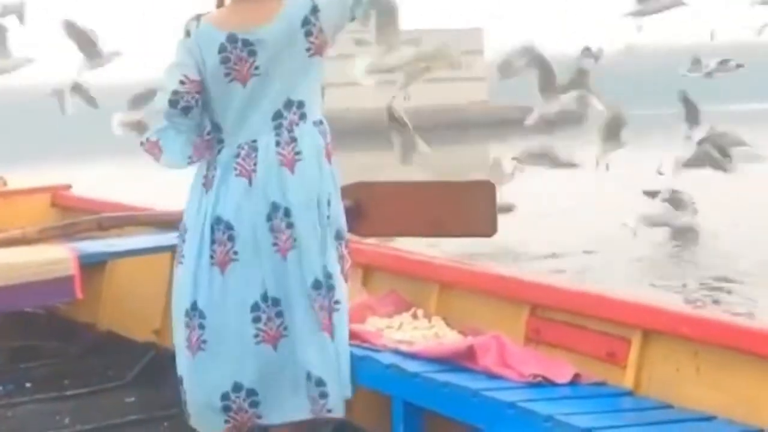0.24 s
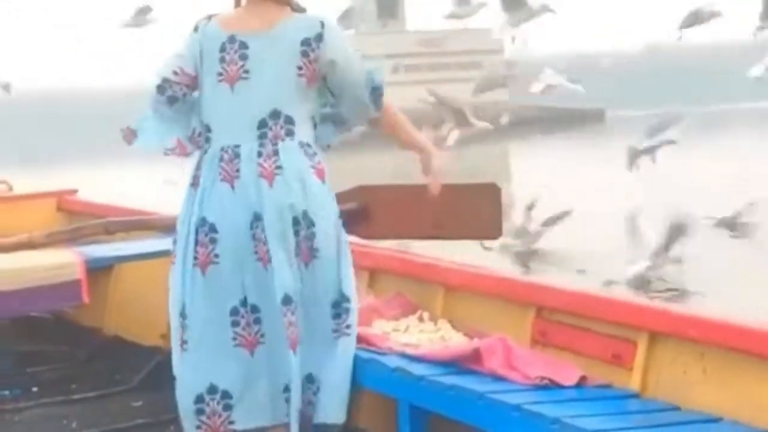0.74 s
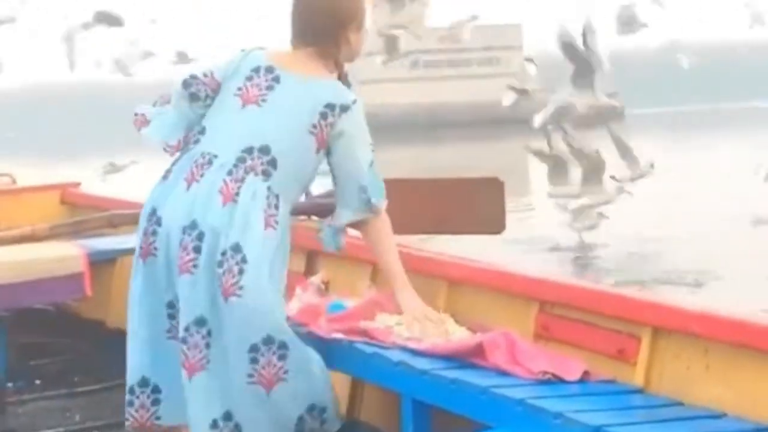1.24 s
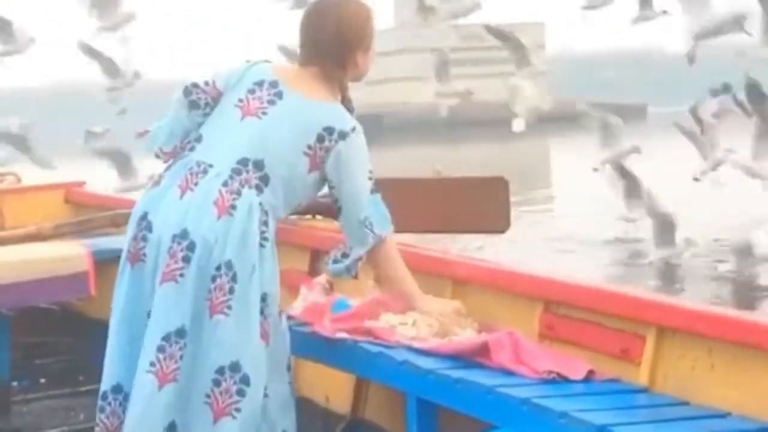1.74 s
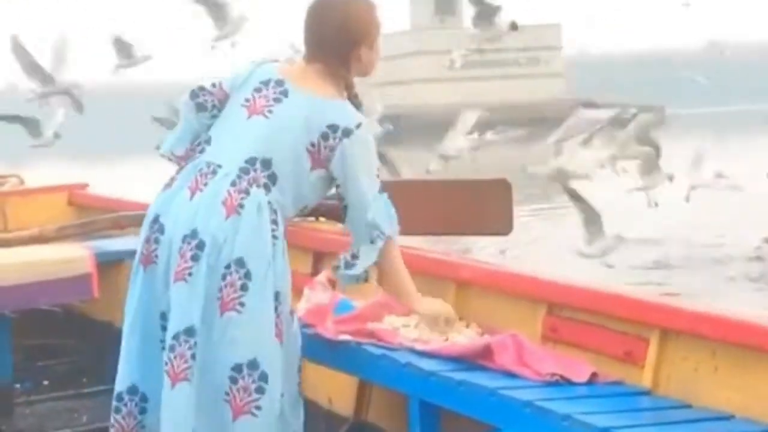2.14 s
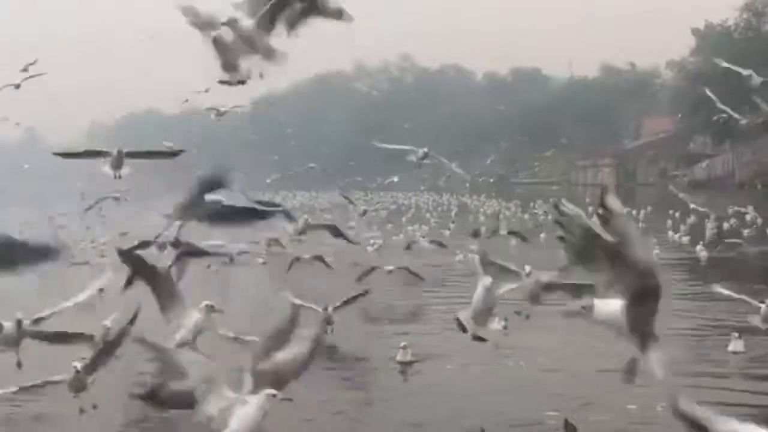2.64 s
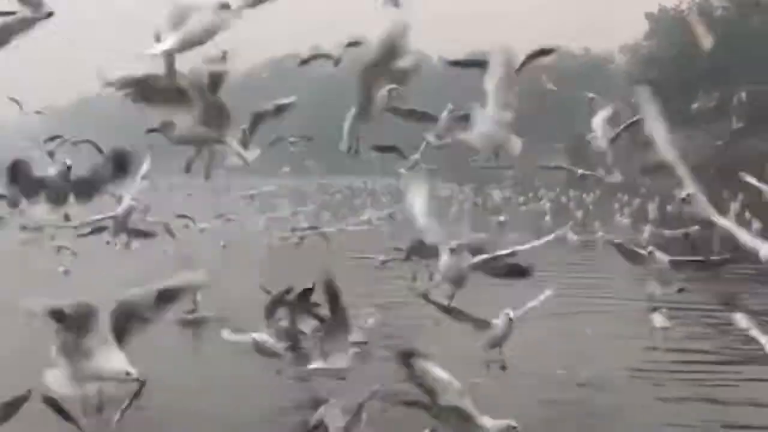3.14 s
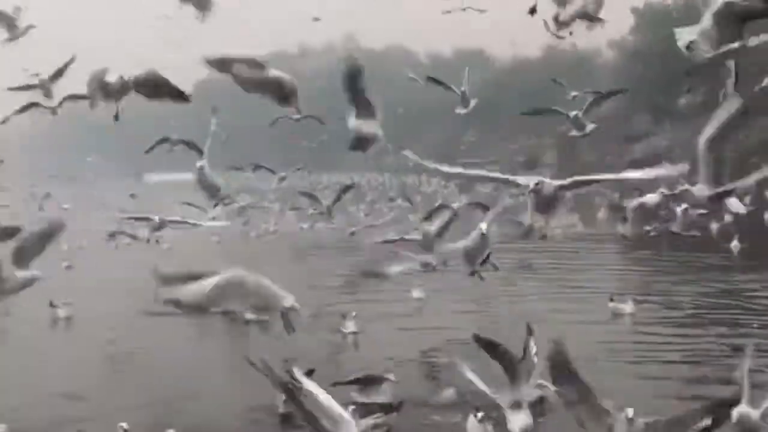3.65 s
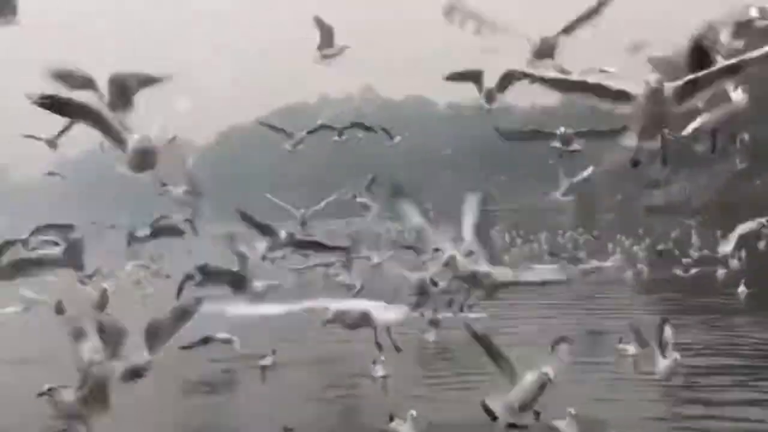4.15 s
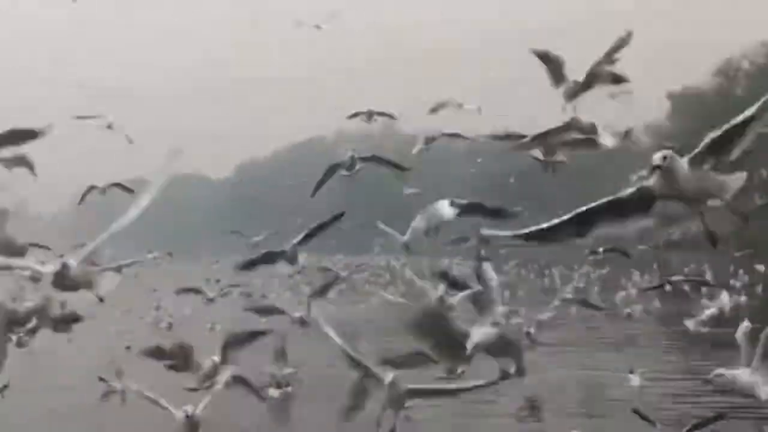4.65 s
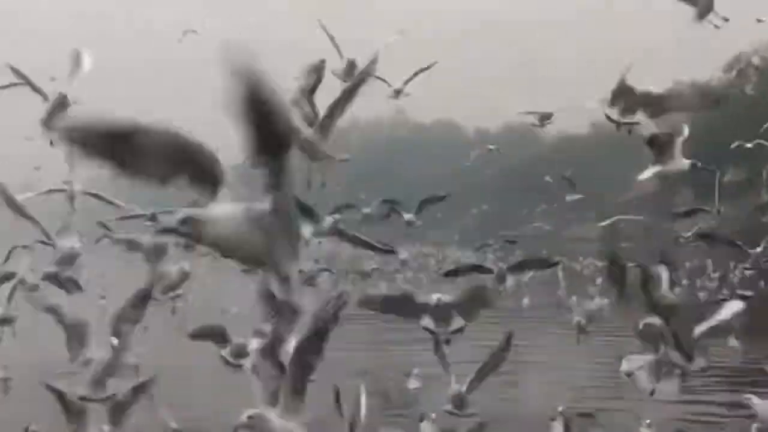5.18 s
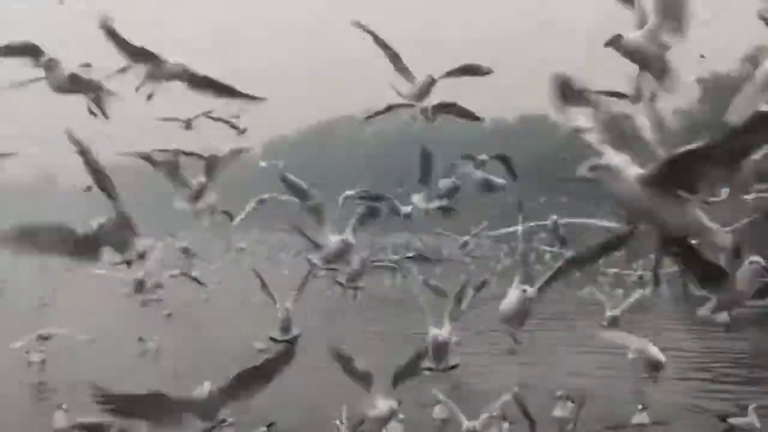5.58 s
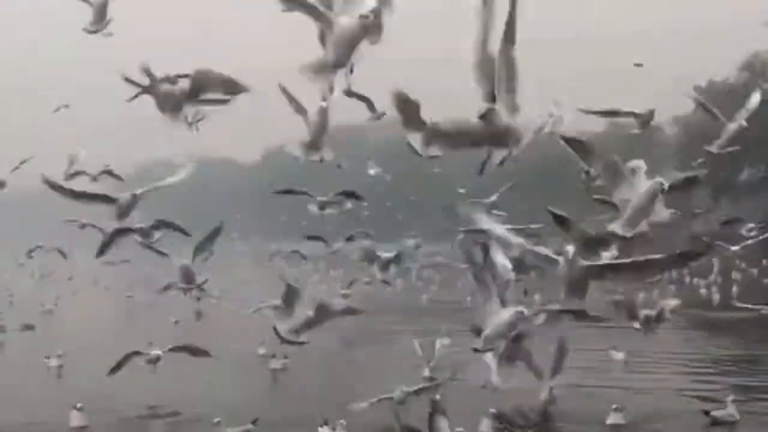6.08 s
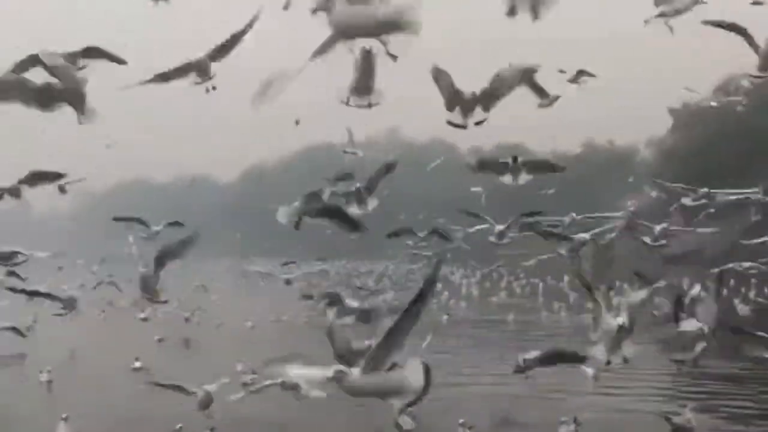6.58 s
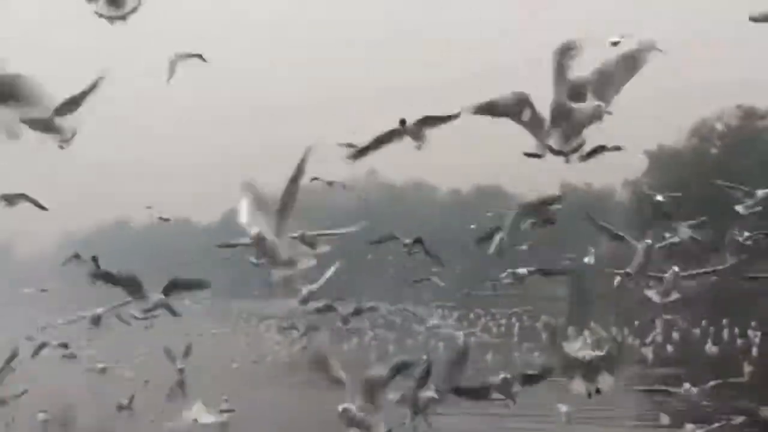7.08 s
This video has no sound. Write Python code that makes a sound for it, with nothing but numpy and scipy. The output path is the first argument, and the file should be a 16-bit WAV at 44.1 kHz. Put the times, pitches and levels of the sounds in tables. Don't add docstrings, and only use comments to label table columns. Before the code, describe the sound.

Overlapping rattling gull cries with low wind thumps beside a boat, cutting abruptly to louder, piercing squeals above a steady low rumble.

```python
import sys
import numpy as np
from scipy import signal
from scipy.io import wavfile
from scipy.ndimage import uniform_filter1d

SR = 44100
rng = np.random.default_rng(int(sys.argv[2]) if len(sys.argv) > 2 else 0)


def invert_db(x):
    u = np.asarray(x, float) / 20
    return 10 ** u


def persist_wave(psi):
    counts = np.round(np.clip(psi, -1, 1) * 32767).astype(np.int16)
    wavfile.write(sys.argv[1], SR, np.atleast_2d(counts).T)


N = 322812
T = np.arange(N) / SR
COARSE_T = T[::64]
CUT_S = 2.563

# frequency in Hz, level in dB per Hz.
FLOCK_BESIDE = [(260, -17), (450, -29), (769, -15.5), (928, -11.5), (1220, -11.5), (1430, -9.5),
                (1580, -7.5), (2240, 3.5), (2750, -2), (4000, 2), (4830, -10), (5580, -9.5), (7900, -17.5),
                (12000, -8.5), (14300, -12.5)]
# frequency in Hz, level in dB per Hz.
FLOCK_OVERHEAD = [(260, 0), (450, -21.5), (1350, -16.5), (2240, -1), (2630, -2.5), (3220, 4.5),
                  (3780, -1.5), (4360, -1), (4970, -10), (5910, -9), (7670, -19), (9390, -22.5),
                  (10400, -22), (12900, -22), (14300, -20)]
# start in seconds, length in seconds, peak level in dB,
# shrillness as upper harmonics in dB relative to the peak.
WAVES_BESIDE = [(-0.164, 0.46, -38, -9.5), (0.087, 0.086, -49, -12), (0.22, 0.2, -40, -11),
                (0.391, 0.11, -43, -7), (0.426, 0.32, -44, -9.5), (0.633, 0.17, -38.5, -11.5),
                (0.773, 0.21, -42.5, -11), (0.948, 0.055, -42, -13), (0.998, 0.18, -40, -9.5),
                (1.103, 0.15, -39, -9), (1.208, 0.29, -39.5, -8.5), (1.373, 0.22, -37, -10),
                (1.534, 0.16, -41, -9), (1.625, 0.2, -39.5, -6.5), (1.763, 0.147, -38, -10.5),
                (1.879, 0.22, -37.5, -7.5), (1.992, 0.39, -38.5, -10), (2.222, 0.34, -40, -9.5),
                (2.479, 0.31, -37, -14.1)]
# start in seconds, length in seconds, peak level in dB,
# shrillness as upper harmonics in dB relative to the peak.
WAVES_OVERHEAD = [(2.423, 0.49, -29, -6.5), (2.756, 0.5, -27, -8), (2.768, 0.082, -29, -15),
                  (3.144, 0.19, -28, -9.5), (3.24, 0.49, -27.5, -6.5), (3.575, 0.22, -29, -7.5),
                  (3.724, 0.36, -30, -8), (3.932, 0.21, -25.5, -9.9), (4.084, 0.18, -27.5, -6.5),
                  (4.191, 0.51, -27.5, -7), (4.217, 0.27, -29.5, -4), (4.596, 0.22, -26.5, -4),
                  (4.66, 0.41, -28.5, -10), (4.763, 0.12, -27, -7.5), (4.895, 0.27, -34, -3),
                  (5.025, 0.22, -25, -8.5), (5.188, 0.32, -29, -7.5), (5.424, 0.24, -27.5, -8.5),
                  (5.527, 0.38, -28.5, -4.5), (5.767, 0.3, -28, -8.8), (5.888, 0.26, -28.5, -5),
                  (6.047, 0.2, -28, -6), (6.127, 0.38, -31, -11.1), (6.267, 0.26, -32.5, -3.9),
                  (6.429, 0.42, -29, -6.5), (6.759, 0.21, -30, -3.5), (6.922, 0.089, -32, -20),
                  (6.979, 0.23, -30.5, -8.1), (7.13, 0.25, -34, -1.1)]
# level of cries in dB, level of upper harmonics in dB.
LULL_DB = [
    (-64, -62.5),
    (-40, -45.5),
]
# frequency in Hz, level in dB per Hz.
OPEN_WIND = [(8.8, -37), (15, -17), (38, 14), (58, -1.5), (189, -14.5), (253, -21.5), (296, -20),
             (454, -29.5), (900, -33), (1170, -65), (1980, -120)]
# frequency in Hz, level in dB per Hz.
SHELTERED_RUMBLE = [(8.8, -66), (15, -36), (21, -60), (37, -1.5), (97, 0), (177, 0.5), (217, -1),
                    (494, -28.5), (900, -8.5), (1170, 7), (1980, -120)]
# start in seconds, length in seconds, thud level in dB,
# flutter in dB relative to the thud.
GUSTS = [(0.034, 0.19, -48, -7), (.168, .129, -37.5, -3.3), (.251, 0.091, -29.5, -17.6),
         (.355, 0.086, -38.5, 0), (.361, 0.16, -33, -20), (.491, 0.18, -30.7, -13.5),
         (.59, 0.12, -31.5, -4.5), (.67, 0.28, -32, -14.5), (.727, .096, -28.8, -30),
         (.775, 0.51, -38, -20), (1.109, 0.11, -35.5, -8), (1.213, .179, -36, -14), (1.26, .07, -33.5, -12),
         (1.357, 0.21, -37, -6.5), (1.457, 0.13, -24.2, -7.5), (1.564, .081, -32.5, -11),
         (1.65, .096, -41, -17), (1.7, 0.19, -33, -13.5), (1.735, 0.093, -30.5, -22), (1.85, .116, -43, -3),
         (1.93, .09, -27, -13), (1.94, 0.22, -25, -15), (2.103, .187, -37.5, -8.6),
         (2.21, 0.14, -27.5, -8.5), (2.323, .168, -26, -9), (2.48, 0.14, -33.5, -10)]
# start in seconds, length in seconds, thud level in dB,
# flutter in dB relative to the thud.
LURCHES = [
    (2.5, .2, -48, -2),
    (2.983, .2, -46, -6),
    (3.57, 0.27, -51, 2),
    (4.51, 0.16, -48, -2),
    (5.233, 0.21, -44.5, 4),
    (6.496, 0.13, -51, -28),
    (6.826, 0.24, -53.5, 9.5),
    (7.207, 0.43, -46, -8),
]
# thud level in dB, flutter level in dB, rush level in dB.
CALM_DB = [
    (-44.5, -63, -61),
    (-49, -54, -50),
]
# start in seconds, length in seconds,
# middle pitch in Hz, slide as a share of pitch, level in dB.
SQUEALS_BESIDE = [(.07, 0.077, 3800, -.04, -43), (0.532, 0.091, 4320, -.08, -45),
                  (0.544, 0.068, 2900, -.06, -47), (1.04, .08, 5700, -.02, -45),
                  (.192, 0.05, 2330, -.02, -39), (.218, 0.05, 3770, .09, -39),
                  (.299, 0.042, 5130, -.03, -41), (.397, .049, 2270, 0.12, -34),
                  (.406, 0.054, 3330, -0.053, -39), (.826, 0.066, 1445, -0.056, -44),
                  (1.15, 0.083, 4460, 0.0, -43), (1.647, 0.087, 3890, -.02, -35.5),
                  (1.662, 0.13, 2640, -0.043, -40), (1.977, 0.11, 4230, .02, -39),
                  (2.167, 0.073, 1907, -0.014, -35.5), (2.354, 0.056, 2360, -.1, -46)]
# start in seconds, length in seconds,
# middle pitch in Hz, slide as a share of pitch, level in dB.
SQUEALS_OVERHEAD = [(2.853, 0.078, 5270, -.02, -32), (3.146, .092, 5740, .02, -33),
                    (3.477, 0.084, 2470, -0.045, -26), (3.49, 0.036, 3690, 0.017, -23),
                    (3.611, 0.059, 3390, 0.029, -27), (3.637, .057, 4540, -.01, -31),
                    (3.989, 0.106, 2440, 0.01, -27), (4.28, 0.082, 2306, 0.0062, -25),
                    (4.36, .059, 5600, 0.0081, -30), (4.69, .06, 3450, 0.021, -29),
                    (4.638, 0.084, 2480, -0.018, -30), (5.07, 0.074, 3240, -.04, -30),
                    (5.112, 0.16, 2340, .03, -24.5), (5.294, 0.07, 2310, -0.029, -29),
                    (5.517, 0.093, 3000, -0.015, -45), (5.63, .11, 5880, -.02, -30),
                    (5.648, 0.12, 3500, 0.073, -30), (5.655, 0.065, 3270, 0.021, -33),
                    (5.946, 0.15, 2400, 0.088, -27), (6.373, 0.07, 5320, 0.012, -34),
                    (6.608, .074, 5470, .03, -33), (6.62, 0.061, 3270, -0.013, -28),
                    (6.841, .043, 5450, -0.043, -35), (6.85, 0.059, 3040, -0.025, -31)]
# start in seconds, peak level in dB.
POPS = [
    (0.382, -38),
    (0.615, -33),
    (1.48, -24.5),
    (1.532, -31),
    (1.957, -31),
    (1.986, -28.5),
    (2.044, -35),
    (2.258, -34),
    (2.376, -28.5),
    (2.399, -33),
]
# start in seconds, length in seconds, pitch in Hz, level in dB.
KNOCKS = [
    (3.6, 0.11, 109, -36),
    (5.27, 0.093, 116.8, -35.5),
    (6.877, 0.105, 101.7, -33.5),
]
# frequency in Hz, width in Hz, share of time empty.
STARVED_BANDS = [
    (4980, 220, 0.09),
    (7840, 210, 0.15),
    (10530, 650, 0.48),
    (13700, 560, 0.24),
]
# start in seconds, length in seconds, step in Hz.
EDGE_STEPS = [
    (.09, .07, 800),
    (.23, .04, 700),
    (.65, .13, -500),
    (.78, .22, 750),
    (1.21, .42, 250),
    (1.21, .18, 300),
    (1.45, .07, 550),
]


def evened(x):
    return x / np.sqrt(np.mean(abs(x) ** 2) + 1e-20)


def read(points, hz):
    f, value = np.transpose(points)
    return np.interp(np.log(hz + 1), np.log(f + 1), value)


def add(mix, s, sound):
    part = mix[round(s * SR):][:len(sound)]
    part += sound[:len(part)]


def smoothed(x, span):
    return uniform_filter1d(uniform_filter1d(x, span), span)


def wander(size, span):
    return evened(smoothed(rng.standard_normal(size), span))


def swells(rows, calm_db, lean, sharp):
    s, length, db, rel_db = np.transpose(rows)[:, :, None]
    progress = np.clip((COARSE_T - s) / length, 0, 1)
    shape = np.sin(np.pi * progress ** lean).clip(0) ** sharp
    levels = []
    for calm, peak_db in zip(calm_db, (db, db + rel_db)):
        power = invert_db(2 * calm) + (invert_db(2 * peak_db) * shape).sum(0)
        levels.append(10 * np.log10(power))
    return levels


def played(x, spectra, shots, edges_hz, size, span, steady):
    hz, _, z = signal.stft(x, SR, nperseg=size, noverlap=size * 3 // 4)
    z = z / np.sqrt(uniform_filter1d(np.mean(abs(z) ** 2, 1), size=3))[:, None]
    out = np.zeros(N)
    for shot, (spectrum, levels_db) in enumerate(zip(spectra, shots)):
        in_shot = (T >= CUT_S) == shot
        for lo, hi, level_db in zip(edges_hz, edges_hz[1:], levels_db):
            slopes = (1 + (lo / (hz + 1)) ** 12) * (1 + (hz / hi) ** 12)
            band = invert_db(read(spectrum, hz)) / np.sqrt(slopes)
            part = signal.istft(z * band[:, None], SR, nperseg=size, noverlap=size * 3 // 4)[1][:N]
            own_swell = smoothed(part ** 2, span) ** (steady[shot] / 2)
            out += evened(part / own_swell) * invert_db(np.interp(T, COARSE_T, level_db)) * in_shot
    return out


def cry(draw, pitch_hz=1110, spread=.13, arch=.07, jitter=.043, rattle=.85, breath=.3):
    long, high, rough, fast, distant, odd, _ = draw
    u = np.linspace(0, 1, int(SR * (.04 + .11 * long ** 2)))
    own_pitch = spread * (2 * high - 1) * (1 + 1.2 * odd ** 4)
    hz = pitch_hz * (1 + own_pitch - arch * (2 * u - .9) ** 2)
    unsteady = 1 + jitter * (0.444 + rough) * wander(len(u), span=40)
    turn = 2 * np.pi * np.cumsum(hz * unsteady) / SR
    pulses = 1 / (1.49 - 1.4 * np.cos(turn))
    pulses = evened(np.gradient(np.gradient(pulses)))
    rattle_hz = (70 + 200 * fast) * (1 + 0.21 * wander(len(u), span=300))
    rattle_turn = 2 * np.pi * np.cumsum(rattle_hz) / SR
    voice = pulses + breath * rng.standard_normal(len(u))
    voice = voice * (1 + rattle * rough * np.cos(rattle_turn))
    return invert_db(-9 * distant) * voice * np.sin(np.pi * u ** .6) ** .7


def calling(shot):
    wash_db, wash_follow = (-50, -38.5)[shot], (0.25, 0.068)[shot]
    hiss_db, hiss_follow = (-57, -44)[shot], (0.4, 0.44)[shot]
    waves = (WAVES_BESIDE, WAVES_OVERHEAD)[shot]
    cries_db, shrill_db = swells(waves, LULL_DB[shot], lean=0.78, sharp=1.97)
    wash_db = wash_db + wash_follow * (cries_db - cries_db.mean())
    hiss_db = hiss_db + hiss_follow * (shrill_db - shrill_db.mean())
    hiss_wander_db = 1.5 * wander(len(hiss_db), span=45)
    return wash_db, cries_db, shrill_db, hiss_db + hiss_wander_db


def flock(count=680, distant_db=-6.5, low_db=-10):
    cries = np.zeros(N)
    for draw in rng.random((count, 7)):
        add(cries, draw[6] * N / SR, cry(draw))
    low_pass = signal.butter(4, 1500, fs=SR, output="sos")
    wash = evened(signal.sosfilt(low_pass, rng.standard_normal(N)))
    blur = evened(cries) + invert_db(distant_db) * rng.standard_normal(N) + invert_db(low_db) * wash
    return played(blur, (FLOCK_BESIDE, FLOCK_OVERHEAD), (calling(0), calling(1)),
                  (400, 1750, 5000, 9000, 15000), size=512, span=1500, steady=(.8, .8))


def blowing(shot):
    thud_db, flutter_db = swells((GUSTS, LURCHES)[shot], CALM_DB[shot], lean=0.68, sharp=3.8)
    flutter_db = flutter_db + 2 * wander(len(flutter_db), span=8)
    rush_db = -45.5 + 1.75 * (flutter_db + 27.5)
    return thud_db, flutter_db, 10 * np.log10(invert_db(2 * CALM_DB[shot][2]) + invert_db(2 * rush_db))


def wind(lumpy_db=2):
    lumps = rng.standard_normal(N) * invert_db(lumpy_db * wander(N, span=400))
    return played(lumps, (OPEN_WIND, SHELTERED_RUMBLE), (blowing(0), blowing(1)),
                  (26, 110, 300, 800), size=2048, span=900, steady=(.9, .3))


def squeals(level_db=-5, jitter_hz=50, tremble_db=3, arch_per_s2=4.0):
    out = np.zeros(N)
    for s, length, middle_hz, slide, db in SQUEALS_BESIDE + SQUEALS_OVERHEAD:
        u = np.linspace(0, 1, int(length * SR))
        arch = arch_per_s2 * length ** 2 * (2 * u - 1) ** 2
        glide = middle_hz * (1 + slide * (u - .5) - arch)
        shake = jitter_hz * glide / 3000 * .06 / length * wander(len(u), span=70)
        tone = np.sin(2 * np.pi * np.cumsum(glide + shake) / SR)
        swell = invert_db(tremble_db * wander(len(u), span=90)) * np.sqrt(2 * np.sin(np.pi * u))
        add(out, s, invert_db(db + level_db) * swell * tone)
    return out


def pops(peak_s=.005, low_hz=120, top_hz=447, gain_db=-6):
    out = np.zeros(N)
    u = np.arange(0, 6, 1 / (peak_s * SR))
    dull = signal.butter(2, [low_hz, top_hz], "bandpass", fs=SR, output="sos")
    for s, db in POPS:
        puff = evened(signal.sosfilt(dull, rng.standard_normal(4000)))[-len(u):]
        add(out, s, invert_db(db + gain_db) * puff * u * np.exp(1 - u))
    return out


def knocks(second_db=-4, third_db=-13):
    out = np.zeros(N)
    for s, length, hz, db in KNOCKS:
        u = np.linspace(0, 1, int(length * SR))
        bend = 1.06 - 0.11 * u + 0.062 * wander(len(u), span=300)
        turn = 2 * np.pi * np.cumsum(hz * bend) / SR
        note = np.sin(turn) + invert_db(second_db) * np.sin(2 * turn + 1) + invert_db(third_db) * np.sin(3 * turn)
        add(out, s, invert_db(db) * note * np.sin(np.pi * u ** 0.45))
    return out


def scene():
    mono = flock() + wind() + squeals() + pops() + knocks()
    return np.tile(mono, (2, 1))


def thinned(x, patchy_db=3, patchy_from_hz=4500):
    hz, t, z = signal.stft(x, SR, nperseg=1024, noverlap=768)
    early = t < CUT_S
    cells = (len(t) // 4 + 1, len(hz) // 4 + 1)
    luck = rng.random(cells).repeat(4, 0).repeat(4, 1).T[:len(hz), :len(t)]
    luck = np.minimum(luck, np.roll(luck, 4, axis=1))
    share = .03 * (hz > 4600) + 0.019 * (hz > 7000)
    for f, width, empty in STARVED_BANDS:
        share = share + empty * np.exp(-((hz - f) / width) ** 2)
    share = share[:, None] * np.where(early, .35, .8)
    clots = uniform_filter1d(rng.standard_normal(z.shape), size=8, axis=0)
    clots = evened(uniform_filter1d(clots, size=5, axis=1))
    clots_db = patchy_db * clots / (1 + (patchy_from_hz / (hz[:, None] + 1)) ** 4)
    edge_hz = np.where(early, 13100, 14000) + np.where(early, 600, 200) * (luck[0] - .4)
    for s, length, step in EDGE_STEPS:
        edge_hz = edge_hz + step * ((t >= s) & (t < s + length))
    kept = np.where(luck < share, .04, invert_db(clots_db)) * (hz[:, None] < edge_hz)
    return signal.istft(z * kept, SR, nperseg=1024, noverlap=768)[1][:N]


def top_cut(x):
    return signal.sosfilt(signal.butter(12, 14440, fs=SR, output="sos"), x)


def record(dry):
    mono = thinned(dry[0])
    add(mono, CUT_S, invert_db(-27) * np.array([1., -1.]))
    return top_cut(np.tile(mono, (2, 1)))


dry = scene()
out = record(dry)
persist_wave(out)
```